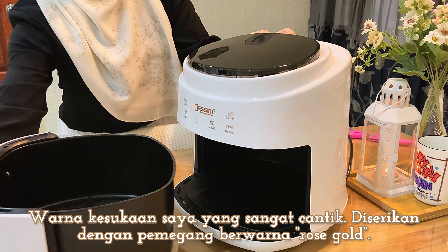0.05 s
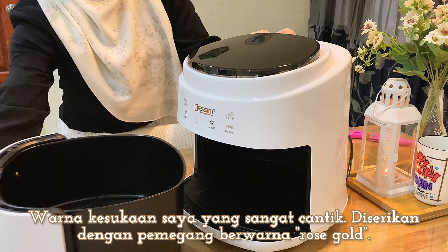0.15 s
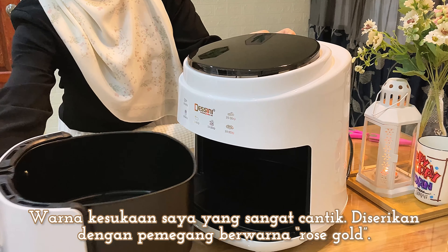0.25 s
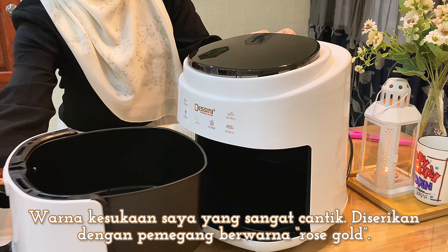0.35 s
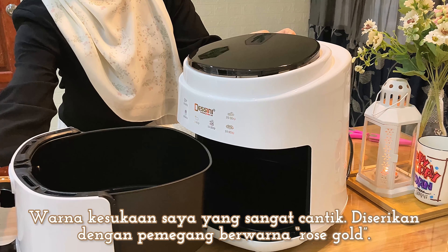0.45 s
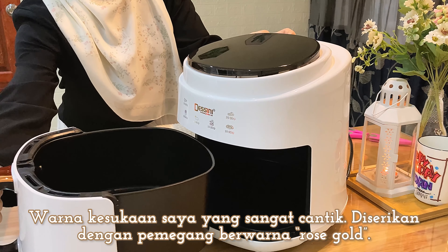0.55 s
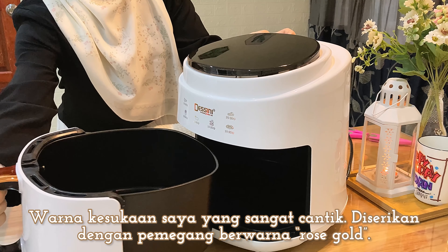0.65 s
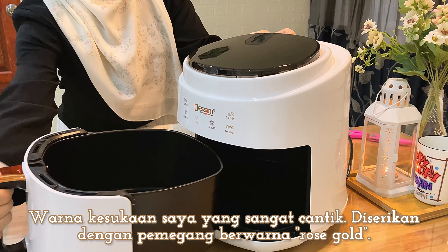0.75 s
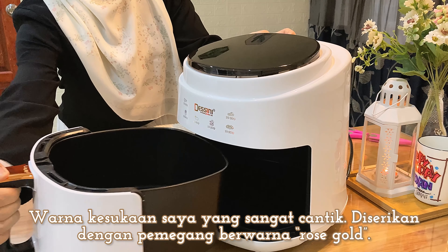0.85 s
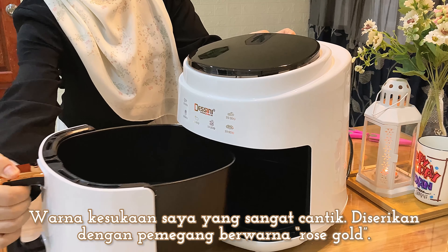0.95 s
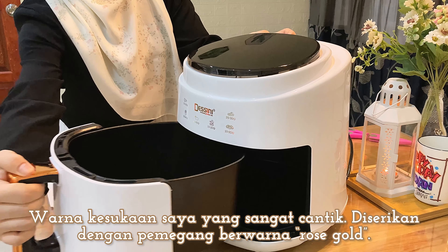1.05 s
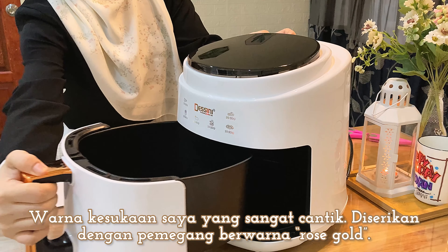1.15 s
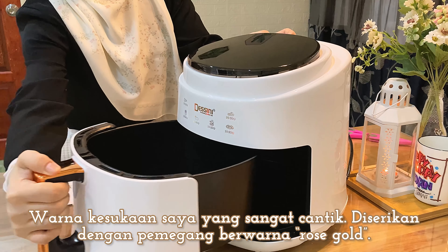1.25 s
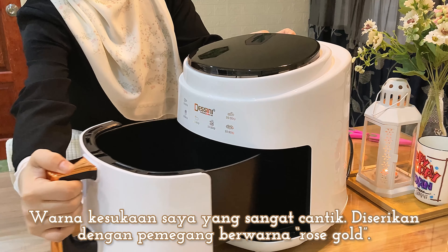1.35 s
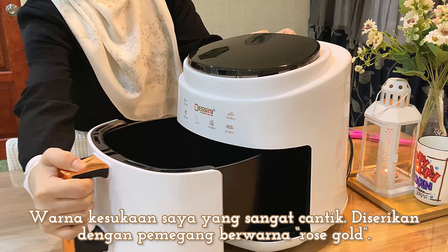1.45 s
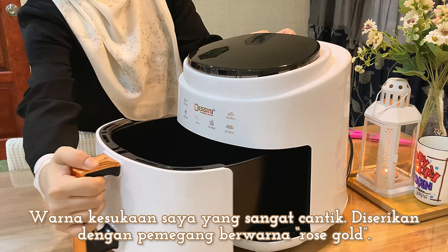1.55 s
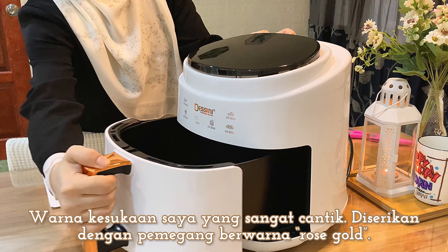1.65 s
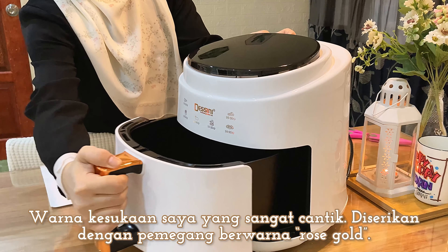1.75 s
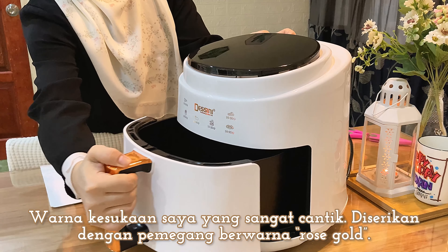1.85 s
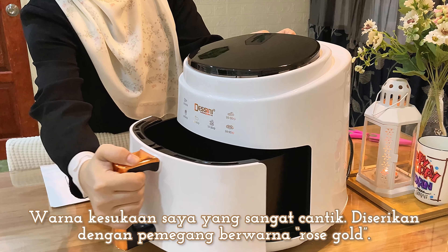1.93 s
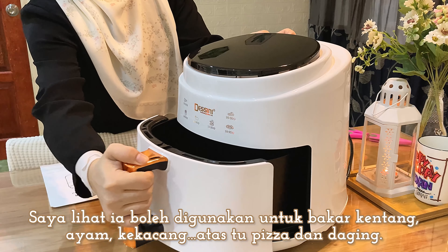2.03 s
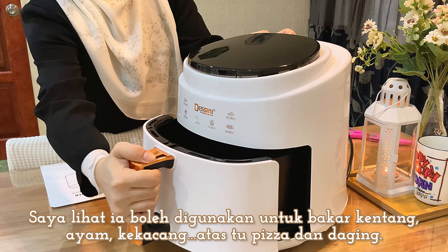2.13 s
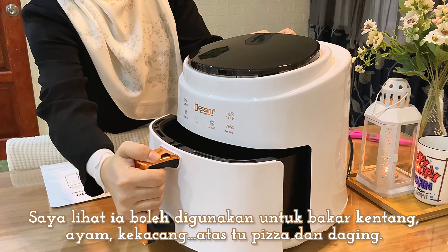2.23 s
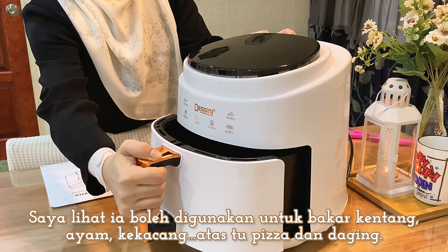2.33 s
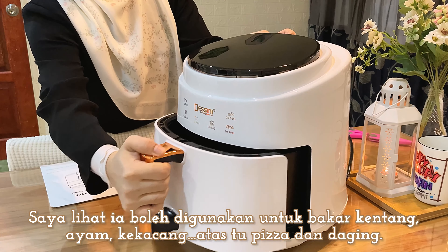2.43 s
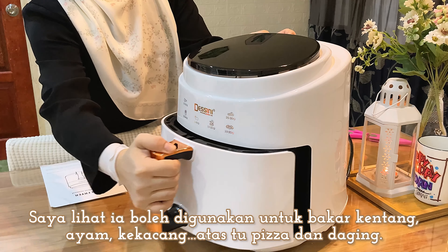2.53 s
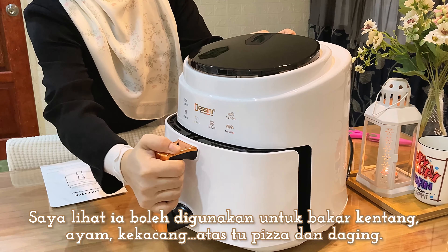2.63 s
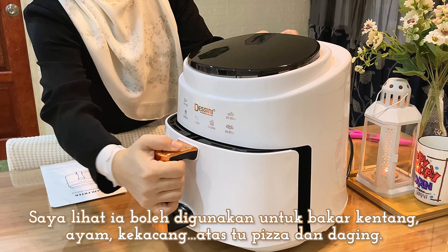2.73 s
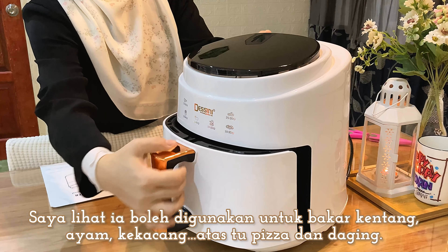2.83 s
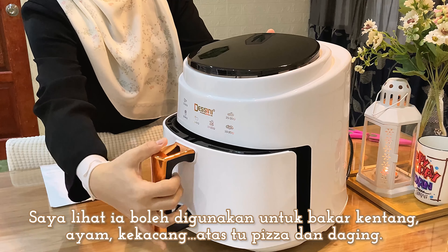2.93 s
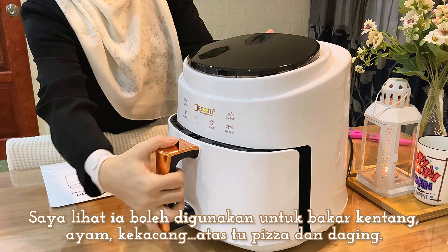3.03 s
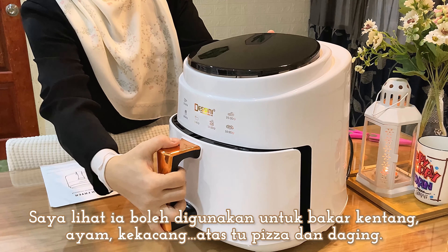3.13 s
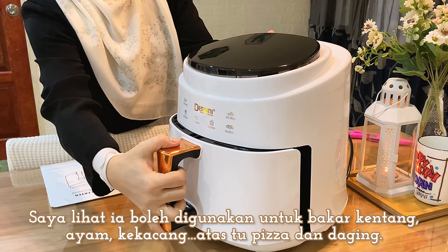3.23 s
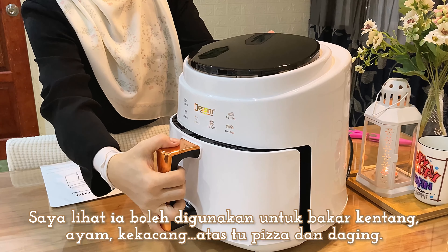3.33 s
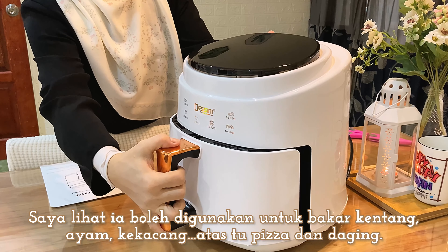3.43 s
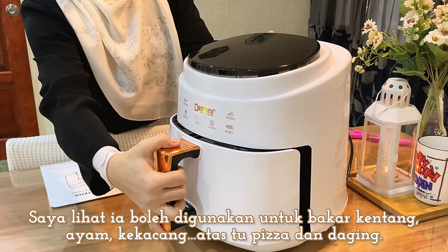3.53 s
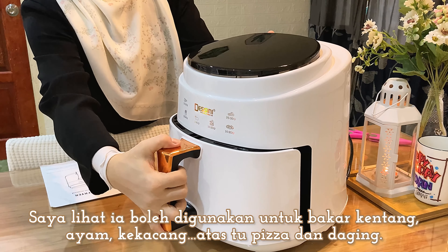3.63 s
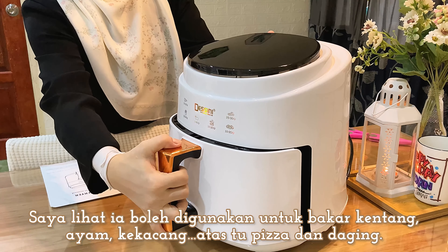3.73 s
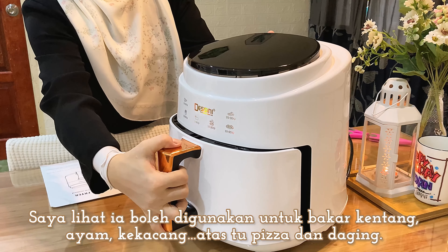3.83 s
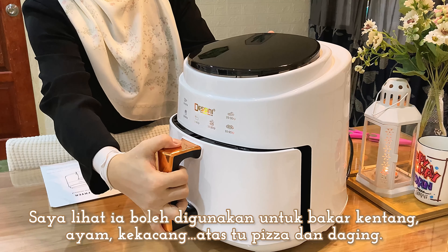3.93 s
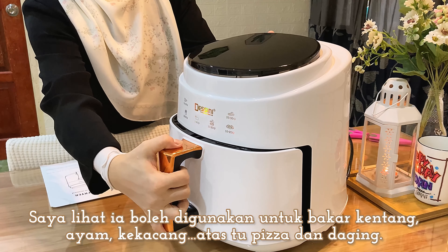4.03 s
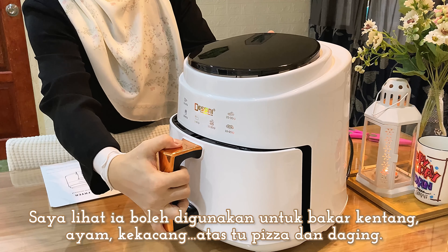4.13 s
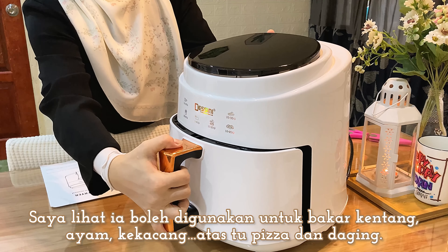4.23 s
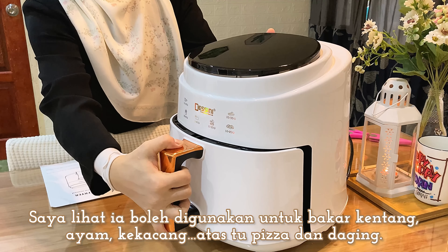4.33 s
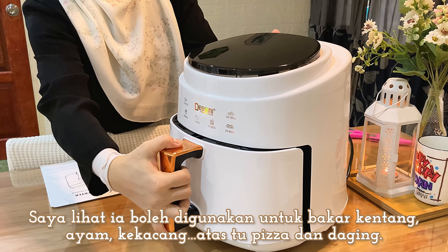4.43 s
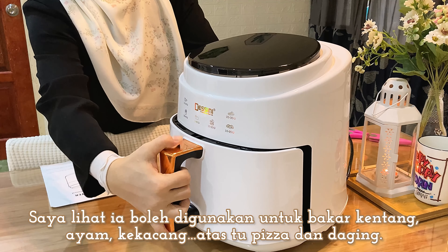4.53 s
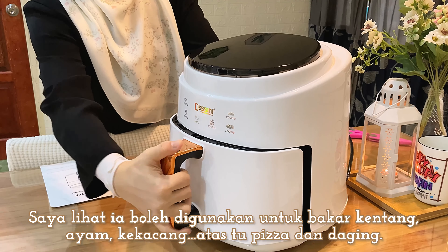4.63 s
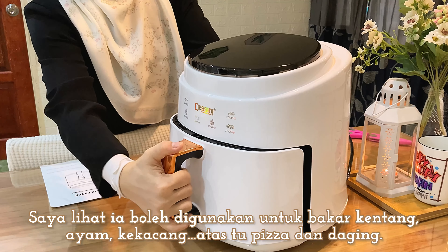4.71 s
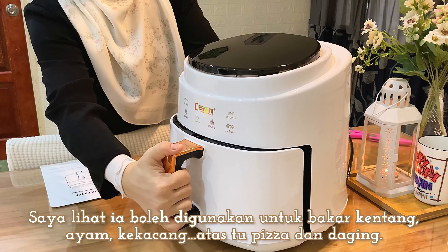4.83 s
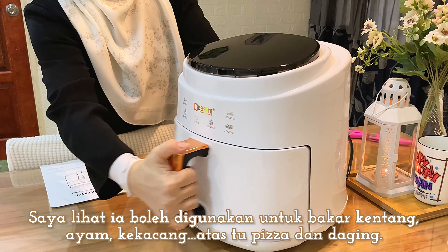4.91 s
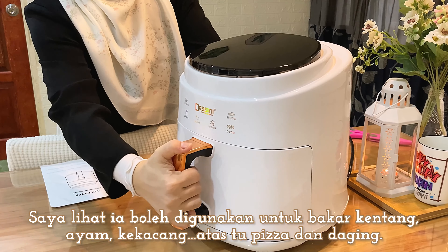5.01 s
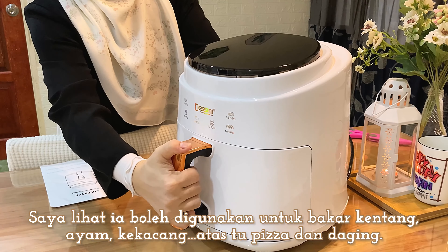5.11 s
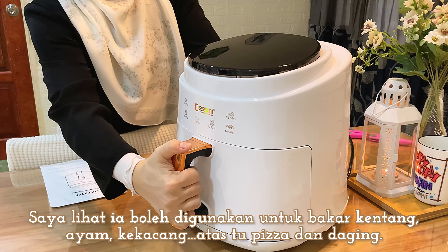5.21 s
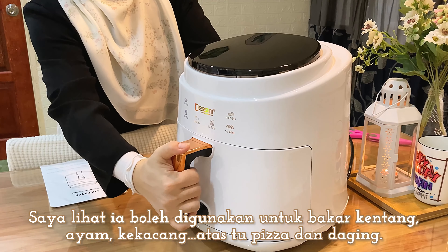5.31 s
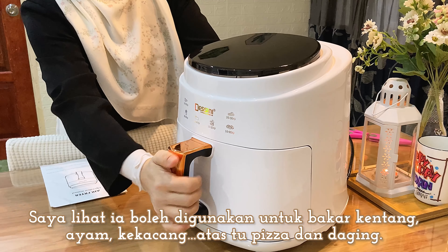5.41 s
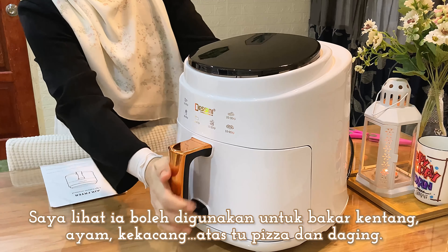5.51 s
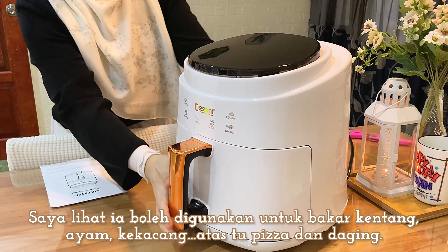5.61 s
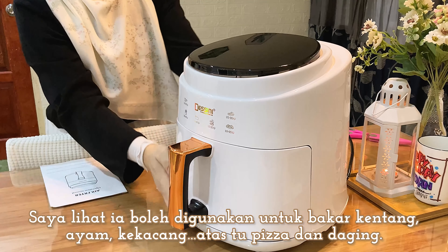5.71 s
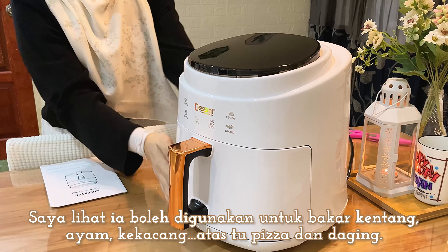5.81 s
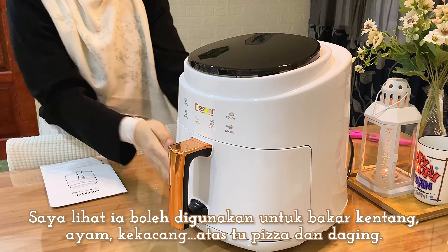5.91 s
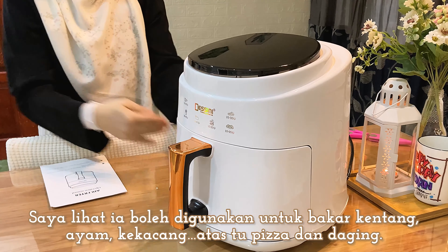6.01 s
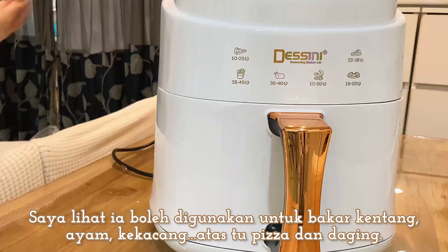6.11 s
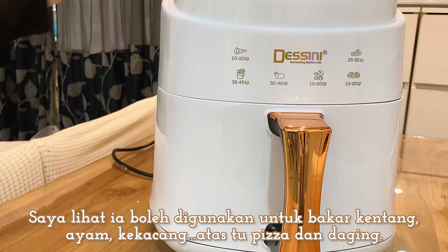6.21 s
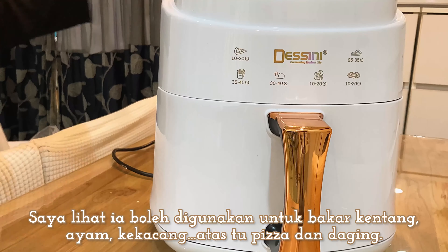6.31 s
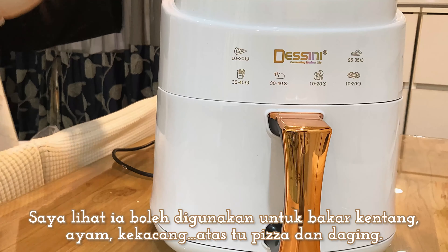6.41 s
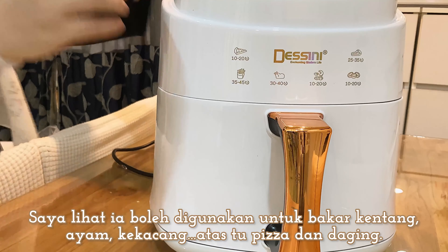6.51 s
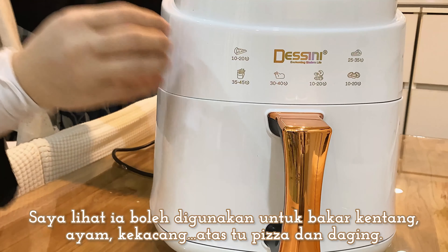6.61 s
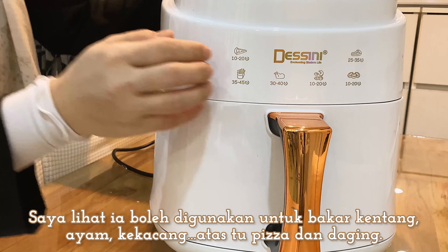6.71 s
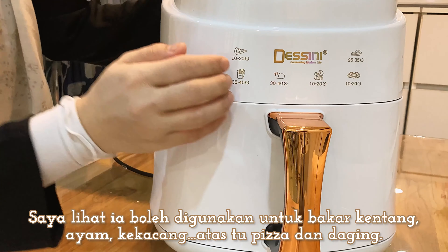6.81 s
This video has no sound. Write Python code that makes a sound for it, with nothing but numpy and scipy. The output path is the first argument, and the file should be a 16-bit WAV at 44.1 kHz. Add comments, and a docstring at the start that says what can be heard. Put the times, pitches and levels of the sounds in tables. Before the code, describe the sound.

A small indoor room, heard close in stereo, with soft air and a low hum. At first only a lifted metal pan sings very faintly. At 1.3 s it nudges the housing: a dull tick with a round hollow ring sinking in pitch, and a fainter touch at 1.45. From 2.0 to 3.1 s the basket goes in by uneven pushes: knocks, gritty stick-slip scraping, short metallic squeals near 2.0 and 2.3, a cluster of hollow knocks around 2.5, and a last rub and bump near 3.05. Small dull handle creaks come at 3.3-3.7, then near quiet. A brush of sleeve precedes a brief catch rasp at 4.9 and a hard, loud slam at 4.94, with two soft rebounds, rattling panels and low table boom dying within about half a second. Small handle clicks at 5.6 and light cloth rustles continue to about 6.5, ending in room air.

```python
"""A small room with a low hum: at a table, an air fryer's basket is guided into its plastic housing.
The pan, ringing faintly, bumps the opening, knocks, scrapes and squeals along the rails, creaks under the hand,
then rides over its spring catch and slams shut. The table booms on, the handle is let go and a sleeve rustles.
Contacts are struck damped modes with bursts of noise; rubbing is random slips through resonances; the squeal is
wavering sines; cloth, rattle, boom and air are shaped noise; decaying noise makes the room's answer."""
import sys
import numpy as np
from scipy import signal
from scipy.fft import rfft, irfft, next_fast_len
from scipy.io import wavfile
from scipy.ndimage import uniform_filter1d, map_coordinates

SR = 44100
rng = np.random.default_rng(int(sys.argv[2]) if len(sys.argv) > 2 else 0)


def generate_wav(sig):
    """Save sig (samples, or channels by samples) to the path in sys.argv[1] as 16-bit PCM at SR."""
    pcm = np.round(np.clip(np.atleast_2d(sig).T, -1, 1) * 32767).astype(np.int16)
    wavfile.write(sys.argv[1], SR, pcm)


N = 302526
TIME = np.arange(N) / SR  # seconds through the scene
AGE = np.arange(SR) / SR  # seconds since a contact

# Steady room air. Each row: frequency in Hz, relative dB per Hz.
AIR = [(25, -35.5), (45, -6), (80, 3.5), (120, -2.5), (200, -1), (320, -4), (630, -11.5), (1300, -16),
       (2000, -23.5), (2600, -31.5), (5000, -41), (15000, -58.5)]
AIR_DB = -60.5
# Low hums. Each row: frequency in Hz, rms level in dB before it wavers.
HUM = [(50, -59), (81, -73.5), (97, -61.5)]
# When each hum is heard. Each row: start in seconds, end in seconds.
HUM_SPANS = [(0, 6.12), (0, 1.3), (6.13, 6.87)]
# How the room dies away. Each row: frequency in Hz, t60 in seconds.
ROOM = [(100, .8), (180, .7), (300, .48), (500, .42), (700, .38), (1200, .4), (2000, .34), (3000, .31),
        (8000, .25), (15000, .22)]
# Stereo likeness. Each row: frequency in Hz, left-right likeness from 0 to 1.
ALIKE = [(100, 0.985), (300, 0.95), (700, 0.5), (1500, 0.33), (3500, 0.2), (8000, 0.08)]
# Stereo timing of contacts. Each row: frequency in Hz, radians by which left leads.
LEAD = [(0, -0.5), (4220, 0.67), (6200, -4), (7580, -7), (12300, -12.5), (13300, -15), (15200, -18.5),
        (16500, -19)]
# Brief dips in level. Each row: start in seconds, end in seconds.
DIPS = [(1.695, 1.815), (3.74, 3.85)]
TOP_HZ = 15650  # band limit

# The pan still singing as it is lifted. Each row: frequency in Hz, level in dB, t60 in seconds.
FADING = [(320, -60.5, 1), (536, -62.5, 1.2), (650, -62, 1.3), (697, -60.5, 1.7), (890, -71, 1.6),
          (4340, -87, 0.79), (5140, -86, 0.71)]

# Strokes of the sleeve. Each row: start in seconds, length in seconds, rustle in dB, fine swish in dB,
# time constant of swell and fade in seconds.
BRUSHES = [(4.517, 0.0091, -63.5, -73, 0.062), (5.347, 0.42, -81.5, -85, 0.023),
           (5.62, .03, -69, -84, .022), (5.726, 0.081, -76, -71.5, 0.033), (5.865, 0.029, -68, -74, 0.029),
           (5.958, 0.023, -69, -72, 0.044), (6.147, 0.038, -71.5, -73.5, 0.034),
           (6.246, 0.042, -69.5, -68, 0.048), (6.435, 0.26, -78, -85.5, 0.07)]
# Rustling folds. Each row: frequency in Hz, relative dB per Hz.
CLOTH = [(600, -12.5), (1500, 5.5), (2400, -0.5), (4500, -4.5), (6000, -15.5), (16000, -26.5)]
# Fine swish of the weave, also the rails' hiss. Each row: frequency in Hz, relative dB per Hz.
SWISH = [(3000, -24), (6000, -11.5), (8000, -5.5), (12000, 0.5), (16000, -8)]

# Slips of the grip. Each row: start in seconds, dry peak level in dB.
CREAKS = [(3.291, -44), (3.36, -42), (3.412, -41.5), (3.585, -47.5), (3.654, -41), (3.667, -42),
          (3.68, -52), (3.699, -50)]
# The creaking handle. Each row: frequency in Hz, relative dB, t60 in seconds.
HANDLE = [(426, 12.5, 0.035), (647, 17.5, 0.014), (825, -4, 0.02), (1140, 8.5, 0.013), (1665, -1, 0.016),
          (2650, -14, 0.012)]

# The free pan nudges the opening. Each row: start in seconds, level in dB.
BUMP = [(1.3201, -33), (1.444, -53)]
# The free pan's other modes against its lowest ring. Each row: frequency in Hz, dB, t60 in seconds.
PAN = [(261, -17, 0.29), (425, -14.5, 0.38), (507, -7, .24), (550, 4, 0.038), (703, -13, 0.18),
       (2035, -7, 0.022)]
# Tick of the nudge. Each row: frequency in Hz, relative dB per Hz.
NUDGE = [(200, -25), (600, -9), (1100, -3), (2100, 0), (3000, -12.5), (4700, -16.5), (6000, -36),
         (16000, -21)]
# The lowest ring sinks as it dies: pitch range and time constant, first decay, then what lingers
SAG_FROM_HZ, SAG_TO_HZ, SAG_S = 395, 311.4, .068
SAG_T60_S, LINGER_DB, LINGER_T60_S = 0.13, -14.5, 1

# Pushes of the pan along the rails. Each row: start in seconds, length in seconds, rubbing in dB,
# grit in dB, fine hiss in dB.
PUSHES = [(1.328, 0.012, -74, -94, -70), (1.986, 0.008, -57.5, -82, -70.5), (2.034, 0.018, -55.5, -69, -87),
          (2.105, 0.057, -55, -74.5, -84), (2.202, 0.068, -61.5, -71, -78),
          (2.281, 0.062, -56.5, -97, -100), (2.447, 0.12, -52.5, -61.5, -76), (2.611, 0.028, -63, -76, -90),
          (2.735, 0.039, -76, -83, -82), (2.825, 0.038, -56.5, -68.5, -79), (2.99, 0.081, -63, -81.5, -84),
          (3.071, 0.018, -45, -74, -95)]
PUSH_ATTACK_S, PUSH_RELEASE_S = 0.014, 0.038  # time constants
# Resonances of the rubbing pan. Each row: frequency in Hz, width in Hz, relative dB.
RAILS = [(247.6, 43.5, 8.5), (301, 62, 8.5), (457, 150, 1.5), (747, 79, -4), (905, 430, -10),
         (1434, 210, -8.5), (1740, 120, -16), (2200, 1000, -12.5), (3520, 1900, -22), (4650, 370, -22)]
# Grit in the rails. Each row: frequency in Hz, relative dB per Hz.
GRIT = [(1200, -17), (2300, 2), (3700, 0), (5000, -3.5), (6200, -8), (8200, -7.5), (12000, -15),
        (16000, -11)]
# Rumble of the housing under the sliding pan. Each row: time in seconds, level in dB.
RUMBLE = [(2.02, -75), (2.13, -58), (2.3, -68), (2.5, -55), (2.7, -65), (2.9, -57.5), (3.0, -58.5),
          (3.06, -49), (3.25, -68)]
# Tone of that rumble. Each row: frequency in Hz, relative dB per Hz.
HOLLOW = [(50, -30), (100, -6), (160, 0), (210, -6), (300, -30), (1000, -75)]

# Squealing rim at the opening. Each row: frequency in Hz, rms in dB before stroke level and wavering.
RIM_OUTER = [(1270, -69), (1513, -67), (1820, -73), (2191, -71), (2320, -67), (2536, -69), (2670, -76),
             (3456, -71), (3704, -74), (3881, -78), (4237, -79), (4710, -77), (5136, -82), (6030, -83),
             (6912, -86), (7560, -84), (8231, -78)]
# Squealing rim deeper in. Each row: frequency in Hz, rms in dB before stroke level and wavering.
RIM_INNER = [(1093, -69), (1825, -70), (2110, -76), (3558, -79), (3750, -82), (4716, -77), (5039, -80),
             (6735, -86), (8236, -84)]
# One squeal for each place. Each row: start in seconds, length in seconds, level in dB, release in seconds.
SQUEALS = [(1.978, 0.09, 1, .11), (2.27, .27, -1.5, .035)]
SQUEAL_ATTACK_S = 0.004  # time constant

# Pushing over the spring catch. Each row: time in seconds, level in dB.
CATCH = [(4.890, -66.5), (4.904, -32.5), (4.917, -32.5), (4.938, -21), (4.95, -46.5)]
# Tone of the catch. Each row: frequency in Hz, relative dB per Hz.
SPRING = [(30, -64.5), (70, -35), (130, -3.5), (350, 1), (900, -8.5), (2000, -8), (3500, -23), (8000, -29),
          (15000, -39.5)]

# Table and housing booming on after the slam. Each row: frequency in Hz, relative dB per Hz.
BOOM = [(40, -40), (110, -14), (150, -1.5), (170, 0.5), (205, -15.5), (270, -5.5), (340, -14), (700, -45.5),
        (2000, -120)]
BOOM_DB, BOOM_RISE_S, BOOM_RELEASE_S = -38.5, .015, 0.14  # level and time constants
# Panels and loose parts shuddering after the slam. Each row: frequency in Hz, relative dB per Hz.
SHUDDER = [(65, -32), (100, -12), (160, -1.5), (230, -15), (330, -2), (500, 1.5), (600, -4), (720, -8.5),
           (950, -1.5), (1400, -13.5), (2000, -13), (2700, -19.5), (4000, -30.5), (9000, -44.5),
           (15000, -52.5)]
SHUDDER_DB, SHUDDER_HOLD_S = -21, 0.0074
SHUDDER_ATTACK_S, SHUDDER_RELEASE_S = 0.001, .047  # time constants

# Basket against housing. Each row: start in seconds, body in dB, hardness in dB per octave, hollow ring in dB,
# thump against body in dB, ring of the struck spot in Hz, level of that ring in dB.
KNOCKS = [(1.976, -42, 1, -23, -19, 934, -6.5), (2.046, -52, -0.5, -6, -15, 1000, 2),
          (2.158, -52, -6.5, -16, -10, 696, -8), (2.261, -40, 1.14, -7, -21, 1838, -7.5),
          (2.413, -55, 0, -11, -7, 1100, -5), (2.476, -46.5, -9, 1, -13, 386, -3),
          (2.539, -39, -0.5, 11, -23, 249, -6), (2.548, -39.5, 2, -6, -21, 850, -10),
          (2.582, -38.5, -14, 17, -15, 320, 8), (2.832, -57.5, -2.5, -4, -8, 900, -8),
          (2.945, -53.5, -4, -11, -10, 993, -6), (3.033, -51, -4.5, 10, -6, 220, -5),
          (3.064, -41.5, 1.03, -9, -11, 1494, -9.5), (3.092, -42, -3, -4, -7, 285, -8)]
# The basket rides over the catch, hits home and settles with two soft rebounds. Each row: start in seconds,
# body in dB, hardness in dB per octave, hollow ring in dB, thump against body in dB, spot in Hz, spot in dB.
SLAM = [(4.918, -29, -14, -12, -12, 275, -3), (4.9405, -14, 1.74, -13, -12.5, 620, -12),
        (4.984, -29.5, -13.5, 12, -18, 361, 3), (5.005, -26, -24, 16, -15, 314, 10)]
# Small hard parts: first the catch, then the handle as it is let go. Each row: start in seconds, body in dB,
# hardness in dB per octave, hollow ring in dB, thump against body in dB, spot in Hz, spot in dB.
CLICKS = [(4.919, -51, 1.9, -14, -6.5, 5600, -22), (5.337, -88.5, 1.4, -14, -13, 12600, -22),
          (5.444, -99, 1.7, -14, -7, 11950, -22), (5.5775, -68.5, -0.21, -10, -11, 7600, -22),
          (5.598, -60.5, -1.5, -10, 2.5, 2214, -20), (5.744, -88.5, 1.4, -10, -7, 8000, -22)]
# Tone of a knock. One row: clack, tick and click in dB against the body band at hardness 0, room in dB,
# sheet metal in dB, t60 of the crack in seconds.
KNOCK_TONE = (1, -10.5, -27, -6.5, -6, 0.09)
# Tone of the slam. One row: clack, tick, click, room and sheet metal in dB, t60 of the crack in seconds.
SLAM_TONE = (-5, -20.5, -25.5, -10.5, -10, 0.0954)
# Tone of the small parts. One row: clack, tick, click, room and sheet metal in dB, crack t60 in seconds
# (below zero: no crack).
CLICK_TONE = (8, 9, 11, -6.5, -16, -0.0152)
# Thump, body, clack, tick and click bands. Each row: from Hz, to Hz.
BANDS = [(85, 190), (230, 720), (720, 2400), (2400, 5500), (5500, 13500)]
# The pan resting on the rails. Each row: frequency in Hz, relative dB, t60 in seconds.
SEATED = [(160, -11, .15), (228, -4, .15), (255, -3, .15), (313, 2, .28), (400, -7, .16), (554, -7, .16),
          (845, -9, .15), (1030, -11, .15), (1170, -8, .2), (1490, -12, .14), (1810, -17, .14),
          (2150, -13, .18), (2720, -14, .13), (2940, -18, .13), (4720, -21, .13)]
# The housing with the basket in it. Each row: frequency in Hz, relative dB, t60 in seconds.
HOUSING = [(91, -15, .45), (119, -14, .5), (153, -16, .35), (170, -20, .65), (224, -21, .3), (268, -21, 1),
           (304, 0, .19), (316, -6, .2), (361.5, -1, .22), (410, -13, .5), (484, -10, .26), (554, -7, .36),
           (607, -5, .12), (732, -12, .22), (856, -5, .25), (908, -9, .2), (1017, -7, .15), (1064, -5, .17),
           (1197, -12, .2), (1332, -15, .28), (1490, -15, .24), (1705, -16, .27), (1997, -12, .24),
           (2315, -17, .2)]
# The hard handle shell. Each row: frequency in Hz, relative dB, t60 in seconds.
SHELL = [(1500, -4, .014), (1900, -2, .012), (2300, 0, .014), (3300, -5, .008), (4900, -6, .008),
         (7600, -7, .006)]
# Damped plastic walls. Each row: frequency in Hz, relative dB, t60 in seconds.
WALL = [(370, -2.5, .04), (600, -1, .035), (850, -4, .025), (1075, 0, .026), (1950, -5.5, .016),
        (2650, -4, .016), (3750, -4, .014), (7700, -19, .012)]
KNOCK_RISE_S, SNAP_RISE_S = 0.0011, 0.00088  # build-up of a glancing knock and a square hit at hardness 0
SOFTENING = 0.026  # growth of the log build-up time for each dB per octave of hardness lost
SOFT_FROM_HZ = 300  # hardness tilts the ringing modes above this
SPOT_CYCLES = 45  # the struck spot's ring falls 60 dB in this many cycles


def amp(db):
    """Decibels to gain."""
    return 10 ** (np.asarray(db) / 20)


def unit(x):
    """Scaled to rms 1."""
    return x / np.sqrt(np.mean(x ** 2) + 1e-20)


def along(points, hz):
    """(Hz, value) points read on a log frequency axis."""
    f, value = np.transpose(points)
    return np.interp(np.log(hz + 1), np.log(f + 1), value)


def fader(rows):
    """A gain per sample drawn through (s, dB) points, lightly smoothed and all but silent outside them."""
    s, db = np.transpose(rows)
    gain = amp(np.interp(TIME, s, db, left=-120, right=-120))
    return uniform_filter1d(gain, size=256)


def stroke(start, length, attack, release):
    """A movement's level: it swells up to its start, holds, then dies away."""
    before = np.minimum(TIME - start, 0)
    after = np.maximum(TIME - start - length, 0)
    return np.exp(before / attack - after / release)


def wobble(rate):
    """A smooth random curve, rate knots a second."""
    knots = rng.standard_normal(int(N * rate / SR) + 4)
    return map_coordinates(knots, [TIME * rate])


def filtered(x, response):
    """x shaped by a complex response of frequency."""
    n = x.shape[-1]
    m = next_fast_len(n + 8192)
    return irfft(rfft(x, m) * response(np.fft.rfftfreq(m, 1 / SR)), m)[..., :n]


def spread(pair):
    """Two unrelated signals to left and right, sharing most in the bass and least in the treble."""
    def mid_side(hz):
        turn = np.arccos(np.clip(along(ALIKE, hz), -1, 1)) / 2
        return np.array([np.cos(turn), np.sin(turn)])

    mid, side = filtered(pair, mid_side)
    return np.array([mid + side, mid - side])


def coloured(pair, spectrum):
    """Stereo sound of rms 1, the pair shaped by the given spectrum."""
    return unit(spread(filtered(pair, lambda hz: amp(along(spectrum, hz)))))


def grains(rate, smooth):
    """Two streams of tiny slips of random size, rate a second, over a share of even noise."""
    slips = (rng.random((2, N)) < rate / SR) * rng.standard_normal((2, N))
    return unit(slips) + smooth * rng.standard_normal((2, N))


def stick_slip(rate, life, steady):
    """Juddering contact force, rms 1: sudden releases, rate a second, fading with time constant life in s."""
    releases = (rng.random(N) < rate / SR) * rng.uniform(.3, 1, N)
    fading = signal.lfilter([1], [1, -np.exp(-1 / (life * SR))], releases)
    return unit(steady + fading)


def ring(modes):
    """Damped modes, each struck with a slightly varied strength."""
    total = 0
    for hz, db, t60 in modes:
        level = amp(db + 1.5 * rng.standard_normal() - 60 * AGE / t60)
        total = total + level * np.sin(2 * np.pi * hz * AGE)
    return total


def sheet_metal(count=110, low_hz=750, high_hz=13500, t60=0.14):
    """The thin pan's many high modes as one response of energy 1; the higher ones die sooner."""
    place, strength = rng.random((2, count))
    hz = low_hz + (high_hz - low_hz) * ((np.arange(count) + place) / count) ** 1.4
    response = ring(zip(hz, -10 * strength, t60 * (hz / 3000) ** -.3))
    return response / np.linalg.norm(response)


def room(x, build=0.00047):
    """The room's stereo answer: decaying noise that builds up quickly and loses its treble first."""
    hz, t, z = signal.stft(rng.standard_normal((2, SR)), SR, nperseg=256)
    t60 = along(ROOM, hz)[:, None]
    noise = signal.istft(z * amp(-60 * t / t60), SR, nperseg=256)[1][:, :SR]
    tail = spread(noise) * (1 - np.exp(-AGE / build))
    tail = tail / np.linalg.norm(tail[0])
    return signal.fftconvolve(np.atleast_2d(x), tail, axes=1)[:, :x.shape[-1]]


def add(track, s, sound):
    """Mix a sound in at time s."""
    start = round(s * SR)
    track[:, start:start + SR] += sound[:, :N - start]


def background(hum_waver_db=1.8, drift=0.25, air_waver_db=1.3):
    """Room air as shaped noise and low hums as sines, both wavering a little."""
    out = amp(AIR_DB + air_waver_db * wobble(35)) * coloured(rng.standard_normal((2, N)), AIR)
    for (hz, db), (start, end) in zip(HUM, HUM_SPANS):
        level = amp(db + hum_waver_db * wobble(11.0)) * fader([(start, 0), (end, 0)])
        out += level * np.sqrt(2) * np.sin(2 * np.pi * hz * TIME + drift * wobble(2.1))
    return out


def lifted():
    """The pan's damped modes, still singing faintly from being picked up."""
    out = np.zeros((2, N))
    add(out, 0, np.tile(ring(FADING), (2, 1)))
    return out


def sleeve(flutter_db=2.0):
    """Cloth brushes the table in short uneven strokes: folds rustle, the weave swishes."""
    strokes = np.array([stroke(s, length, fade, fade) for s, length, *levels, fade in BRUSHES])
    rustle, swish = amp(np.array(BRUSHES)[:, 2:4]).T @ strokes
    folds = rustle * coloured(grains(rate=1100, smooth=0.4), CLOTH)
    weave = swish * coloured(grains(rate=5400, smooth=0.58), SWISH)
    return amp(flutter_db * wobble(35)) * (folds + weave)


def creaks(wet_db=-3, rise=0.0042):
    """The handle slips in small dull steps under the hand, each ringing its damped modes."""
    out = np.zeros((2, N))
    for s, db in CREAKS:
        slip = ring(HANDLE) * (1 - np.exp(-AGE / rise))
        slip = amp(db) * slip / np.abs(slip).max()
        add(out, s, slip + amp(wet_db) * room(slip))
    return out


def bump(tick_db=-11, tick_t60=0.063, wet_db=-12, rise=0.0019):
    """The free pan nudges the opening: a dull tick and a round ring that sinks in pitch."""
    out = np.zeros((2, N))
    hz = SAG_TO_HZ + (SAG_FROM_HZ - SAG_TO_HZ) * np.exp(-AGE / SAG_S)
    decay = amp(-60 * AGE / SAG_T60_S) + amp(LINGER_DB - 60 * AGE / LINGER_T60_S)
    sinking = np.sin(2 * np.pi * np.cumsum(hz) / SR) * decay
    for s, db in BUMP:
        tick = amp(tick_db - 60 * AGE / tick_t60) * coloured(rng.standard_normal((2, SR)), NUDGE)
        dry = amp(db) * (1 - np.exp(-AGE / rise)) * (sinking + ring(PAN) + tick)
        add(out, s, dry + amp(wet_db) * room(dry))
    return out


def rail_resonances(f):
    """The rubbing pan's response: parallel resonances of alternating sign."""
    total = 0
    for k, (centre, width, db) in enumerate(RAILS):
        damping = 1j * f * width
        total = total + (-1) ** k * amp(db) * damping / (centre * centre - f * f + damping)
    return total


def scrape(metal, sing_db=-2, wet_db=-6, judder_db=3.0):
    """Pushes drag the pan on the rails: it sticks and slips, exciting pan and housing, with grit and hiss on top."""
    strokes = np.array([stroke(s, length, PUSH_ATTACK_S, PUSH_RELEASE_S) for s, length, *levels in PUSHES])
    rub, grit, hiss = amp(np.array(PUSHES)[:, 2:]).T @ strokes
    judder = stick_slip(rate=260, life=.003, steady=.55) * amp(judder_db * wobble(45))
    rubbing = filtered(judder * grains(rate=1100, smooth=0.14), rail_resonances)
    dry = rub * unit(spread(rubbing))
    dry = dry + grit * coloured(judder * grains(rate=1500, smooth=.9), GRIT)
    singing = signal.fftconvolve(dry, metal[None], axes=1)[:, :N]
    rumble = fader(RUMBLE) * coloured(grains(rate=600, smooth=.5), HOLLOW)
    fine_hiss = hiss * coloured(grains(rate=5600, smooth=1.0), SWISH)
    return dry + amp(sing_db) * singing + amp(wet_db) * room(dry) + rumble + fine_hiss


def squeal(waver_db=2.5, drift=0.6, apart=0.53):
    """Rubbing keeps the rim's modes ringing; each wavers on its own and reaches left and right out of step."""
    out = np.zeros((2, N))
    for modes, (s, length, db, release) in zip((RIM_OUTER, RIM_INNER), SQUEALS):
        level = amp(db) * stroke(s, length, SQUEAL_ATTACK_S, release)
        heard = level > amp(-60)
        t = TIME[heard]
        for hz, mode_db in modes:
            swell, wander = (map_coordinates(knots, [t * 25]) for knots in rng.standard_normal((2, 200)))
            phase = 2 * np.pi * hz * t + drift * wander + apart * rng.standard_normal((2, 1))
            mode_level = level[heard] * amp(mode_db + waver_db * swell)
            out[:, heard] += mode_level * np.sqrt(2) * np.sin(phase)
    return out


def catch():
    """A short rising rasp of grains as the basket is forced over the spring."""
    return fader(CATCH) * coloured(grains(rate=2600, smooth=0.6), SPRING)


def boom():
    """Table and housing boom on as the slam dies away: low noise bands that beat like close resonances."""
    level = amp(BOOM_DB) * stroke(SLAM[1][0], 0, BOOM_RISE_S, BOOM_RELEASE_S)
    level = level * (TIME > SLAM[0][0])  # silent until the basket meets the catch
    return level * coloured(rng.standard_normal((2, N)), BOOM)


def shudder(wet_db=-5):
    """The slam shakes every panel and loose part at once: a dense, rattling thud that dies into the room."""
    level = amp(SHUDDER_DB) * stroke(SLAM[1][0], SHUDDER_HOLD_S, SHUDDER_ATTACK_S, SHUDDER_RELEASE_S)
    rattle = stick_slip(rate=170, life=.004, steady=.6)
    dry = level * coloured(rattle * grains(rate=2200, smooth=.7), SHUDDER)
    return dry + amp(wet_db) * room(dry)


def out_of_step(hz):
    """Opposite phase turns for left and right, so that the treble arrives out of step."""
    return np.exp(np.array([[.5j], [-.5j]]) * along(LEAD, hz))


def blow(modes, clang, band_db, ring_db, wet_db, rise, crack_t60, crack_db=-1):
    """One contact: a crack, the walls' short clack, a clang and the hollow ring, levelled band by band."""
    strike = unit(ring(WALL)) + clang
    if crack_t60 > 0:
        crack = unit(rng.standard_normal(SR) * amp(-60 * AGE / crack_t60))
        strike = strike + amp(crack_db) * crack
    onset = 1 - np.exp(-AGE / rise)  # a contact takes a moment to build
    direct = onset * (strike + amp(ring_db) * unit(ring(modes)))
    sound = filtered(direct, out_of_step) + amp(wet_db) * room(direct)
    out = np.zeros((2, SR))
    for (lo, hi), db in zip(BANDS, band_db):
        band = signal.sosfilt(signal.butter(3, [lo, hi], "band", fs=SR, output="sos"), sound)
        attack = int((.02 + 3 / lo) * SR)  # low bands need longer to speak
        out += amp(db) * band / np.sqrt(np.mean(band[:, :attack] ** 2))
    return out


def knocks(metal):
    """Knocks, slam and clicks: harder contacts are brighter and build faster; each struck spot has its ring."""
    out = np.zeros((2, N))
    centres = np.sqrt(np.prod(BANDS, axis=1))
    octaves = np.maximum(np.log2(centres / centres[1]), 0)  # above the body band
    kinds = ((KNOCKS, SEATED, KNOCK_TONE, KNOCK_RISE_S),
             (SLAM, HOUSING, SLAM_TONE, SNAP_RISE_S),
             (CLICKS, SHELL, CLICK_TONE, SNAP_RISE_S))
    for rows, modes, (*treble_db, wet_db, metal_db, crack_t60), rise in kinds:
        for s, db, hardness, ring_db, thump_db, spot_hz, spot_db in rows:
            band_db = db + np.array([thump_db, 0, *treble_db]) + hardness * octaves
            excited = [(hz, level + hardness * max(np.log2(hz / SOFT_FROM_HZ), 0), t60)
                       for hz, level, t60 in modes]
            spot = unit(ring([(spot_hz, 0, SPOT_CYCLES / spot_hz)]))
            clang = amp(metal_db) * unit(metal) + amp(spot_db) * spot
            build = rise * np.exp(-SOFTENING * hardness)
            add(out, s, blow(excited, clang, band_db, ring_db, wet_db, build, crack_t60))
    return out


def scene():
    """Everything at the table, from the room to the basket."""
    metal = sheet_metal()
    surroundings = background() + lifted() + sleeve()
    sliding = creaks() + bump() + scrape(metal) + squeal()
    closing = catch() + boom() + shudder()
    return surroundings + sliding + closing + knocks(metal)


def record(dry, dip_db=-11, hiss_db=-86):
    """The level dips twice over an even hiss; the top peaks are rounded off and the band limit is steep."""
    dipped = sum(fader([(start, 0), (end, 0)]) for start, end in DIPS)
    x = dry * amp(dip_db * dipped) + amp(hiss_db) * rng.standard_normal((2, N))
    x = x / (1 + np.abs(x / .92) ** 6) ** (1 / 6)
    return filtered(x, lambda hz: 1 / np.sqrt(1 + (hz / TOP_HZ) ** 160))


dry = scene()
out = record(dry)
generate_wav(out)
```